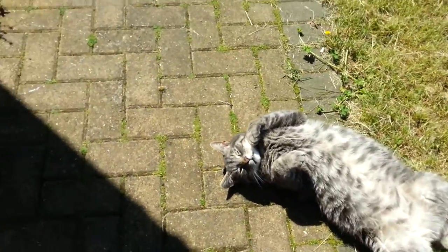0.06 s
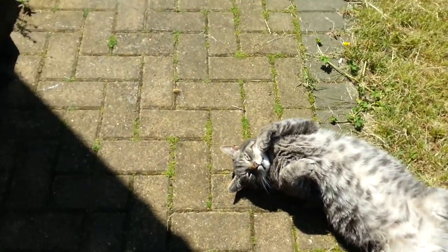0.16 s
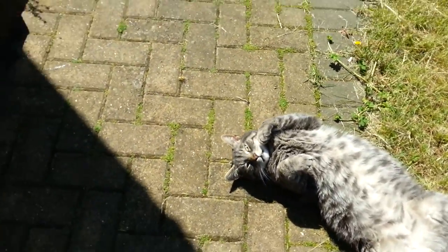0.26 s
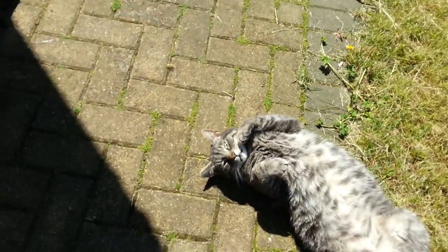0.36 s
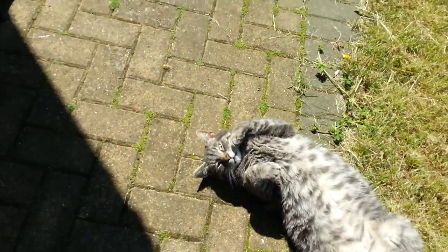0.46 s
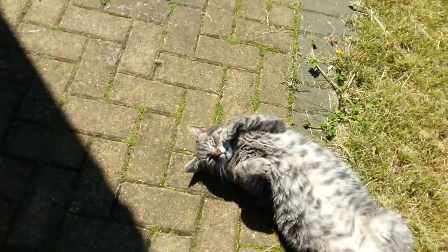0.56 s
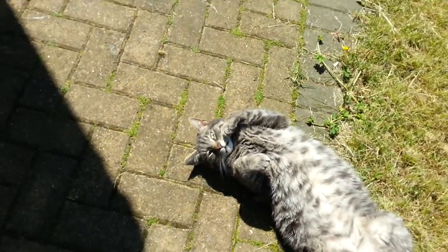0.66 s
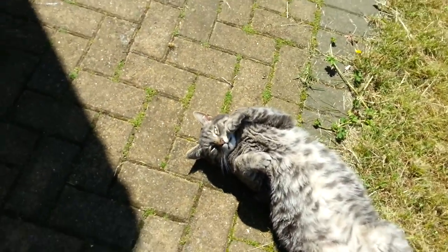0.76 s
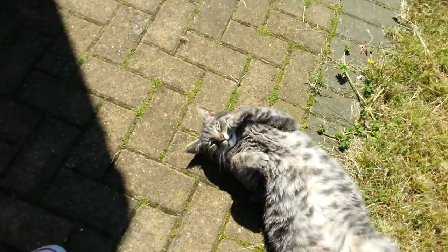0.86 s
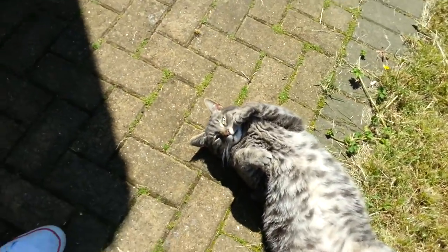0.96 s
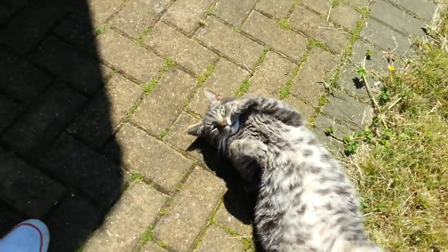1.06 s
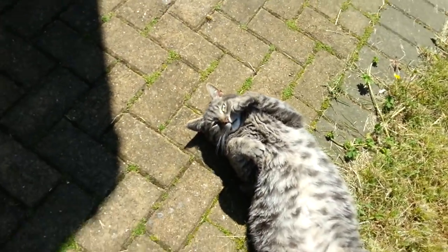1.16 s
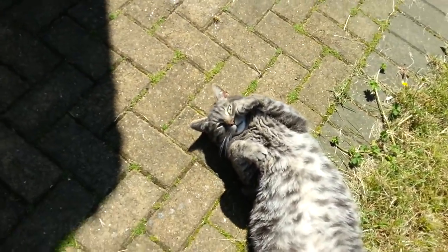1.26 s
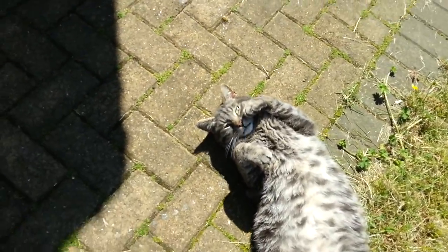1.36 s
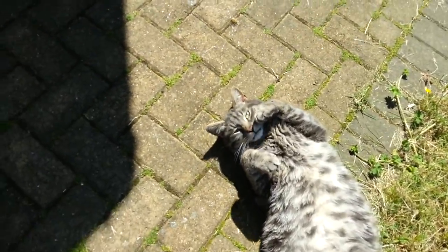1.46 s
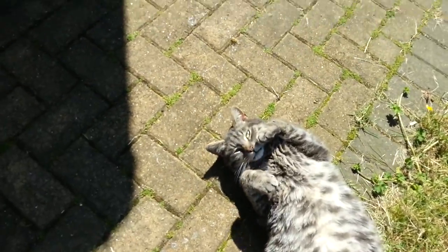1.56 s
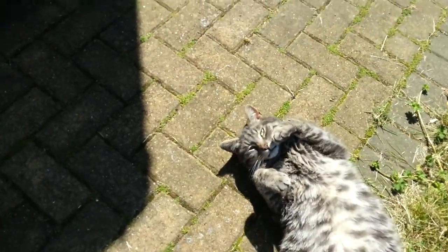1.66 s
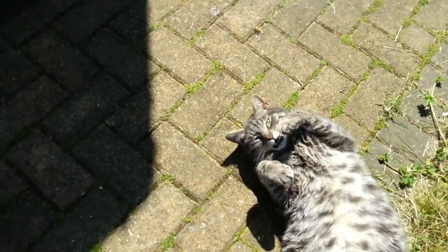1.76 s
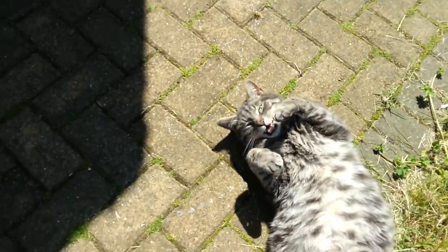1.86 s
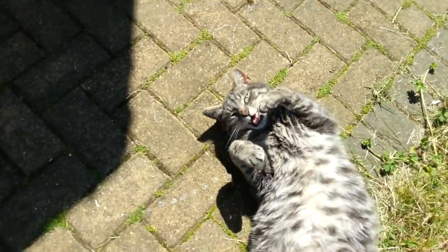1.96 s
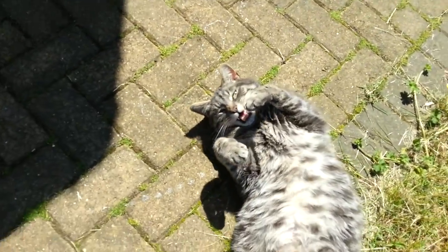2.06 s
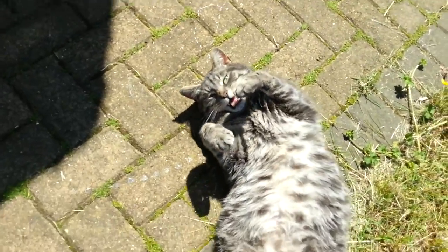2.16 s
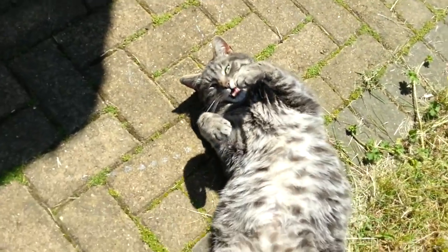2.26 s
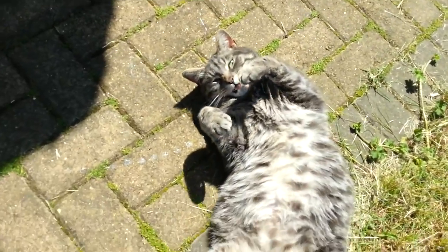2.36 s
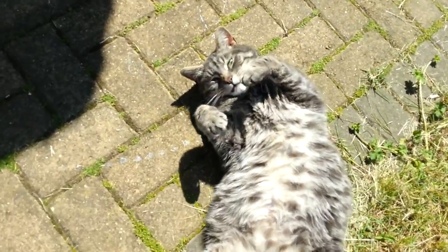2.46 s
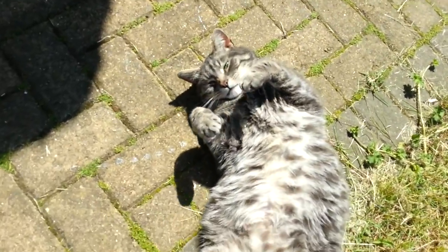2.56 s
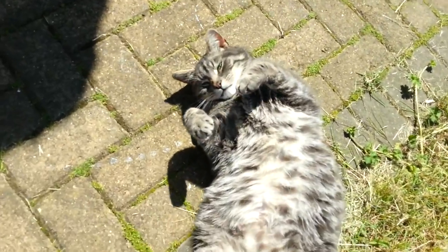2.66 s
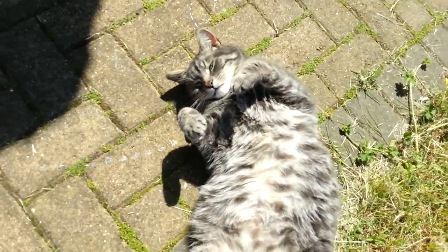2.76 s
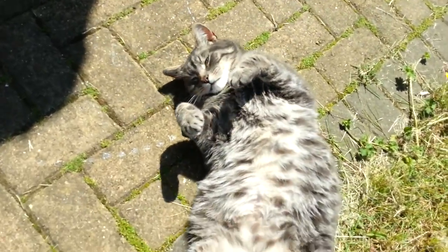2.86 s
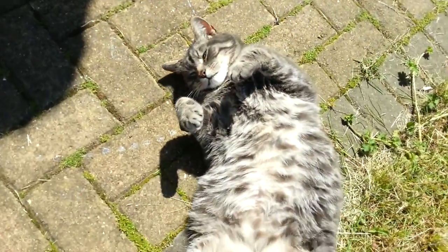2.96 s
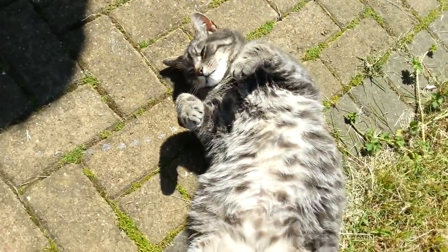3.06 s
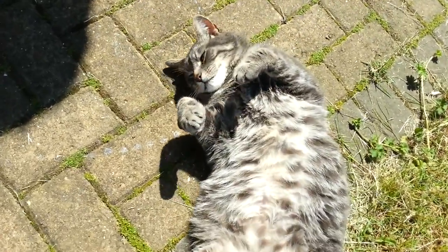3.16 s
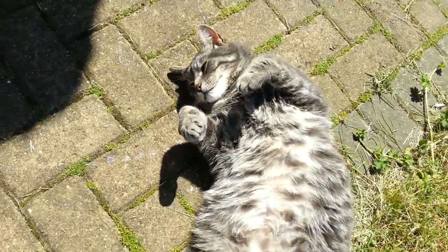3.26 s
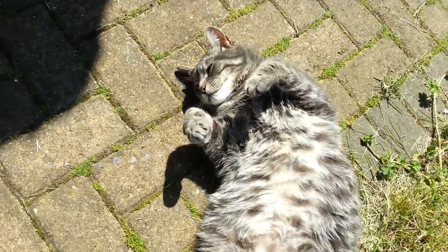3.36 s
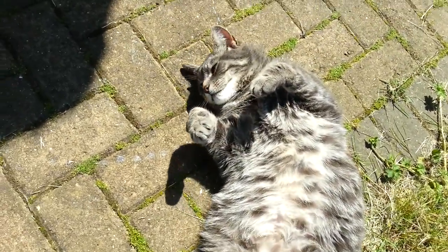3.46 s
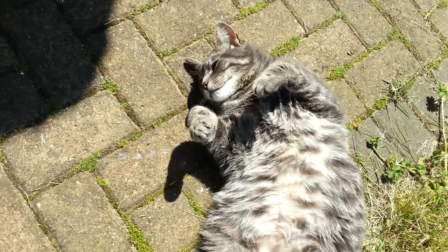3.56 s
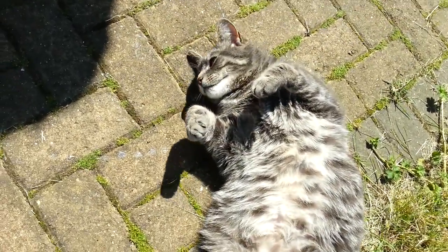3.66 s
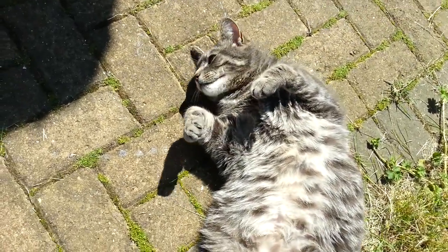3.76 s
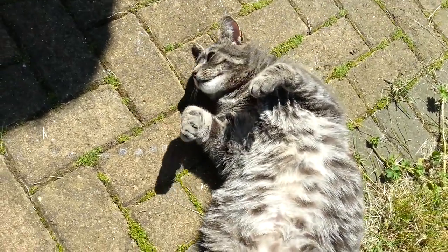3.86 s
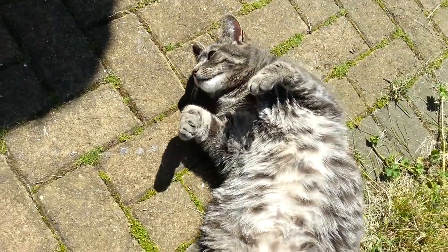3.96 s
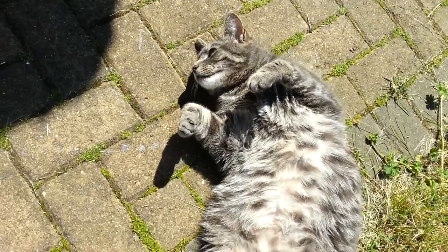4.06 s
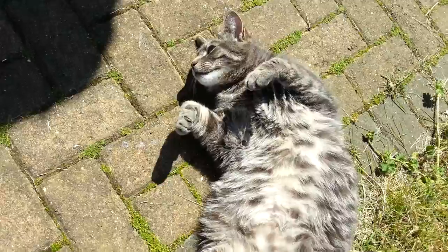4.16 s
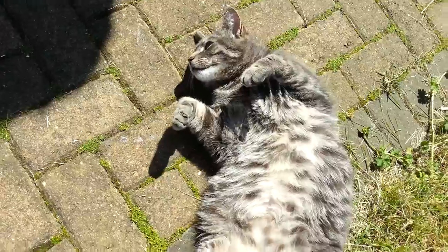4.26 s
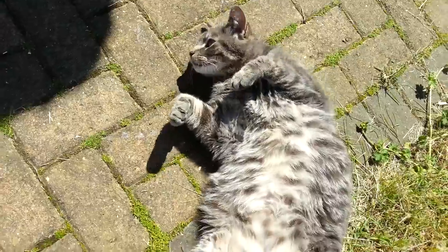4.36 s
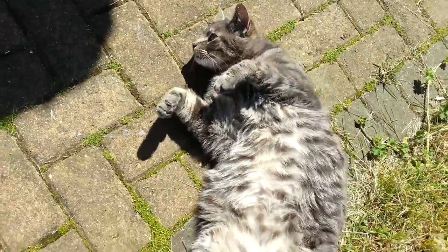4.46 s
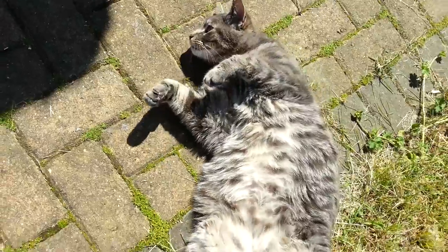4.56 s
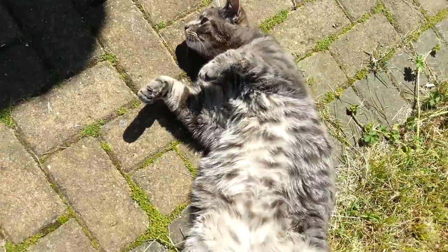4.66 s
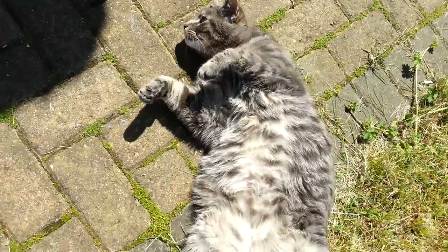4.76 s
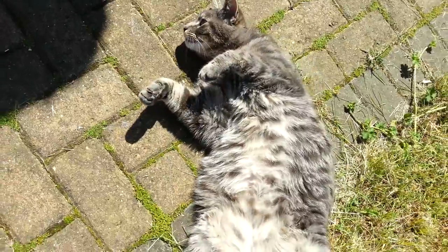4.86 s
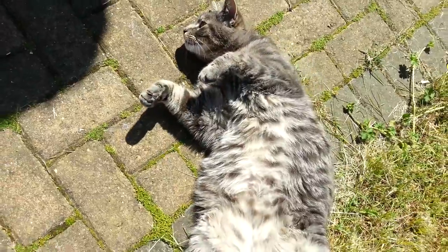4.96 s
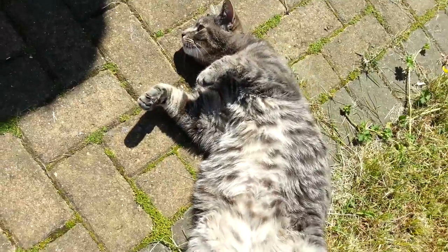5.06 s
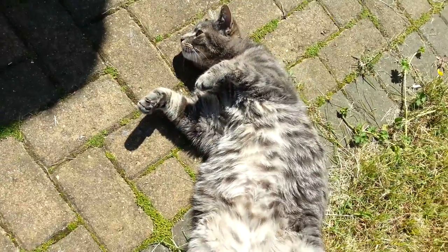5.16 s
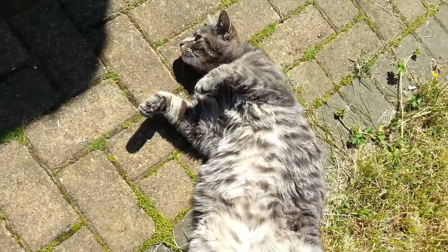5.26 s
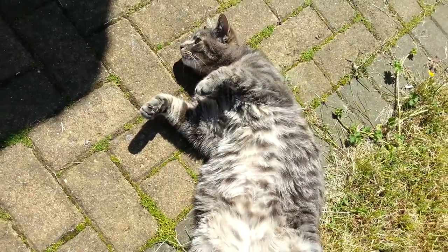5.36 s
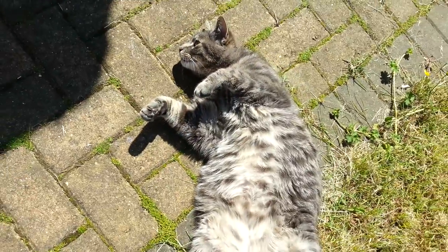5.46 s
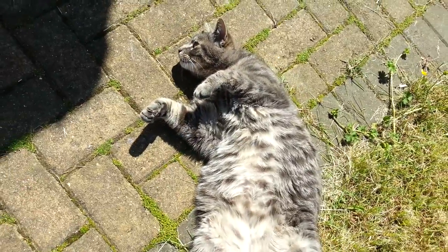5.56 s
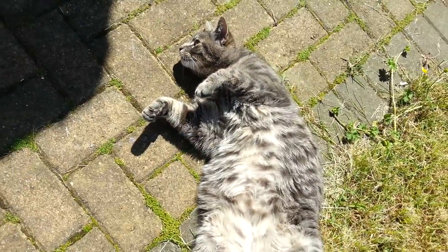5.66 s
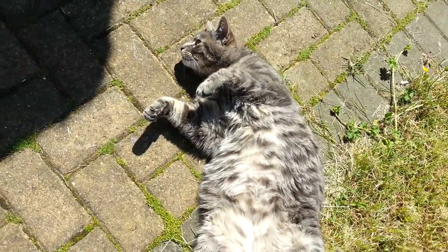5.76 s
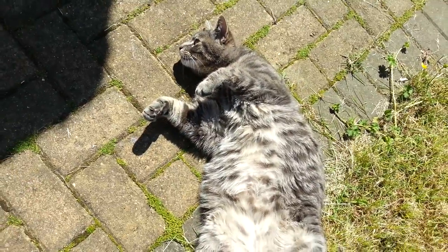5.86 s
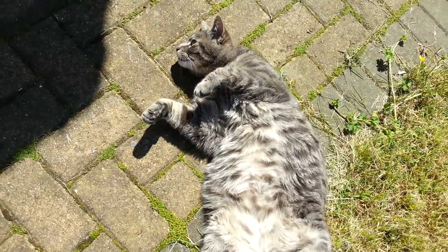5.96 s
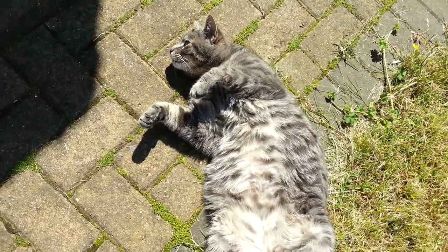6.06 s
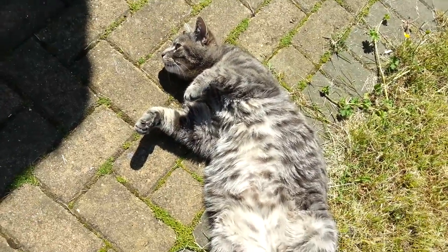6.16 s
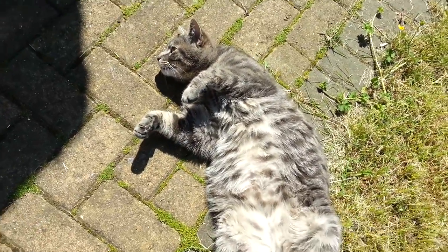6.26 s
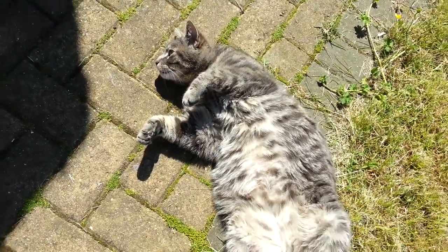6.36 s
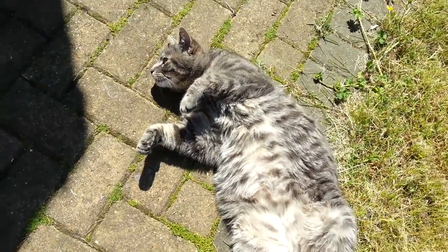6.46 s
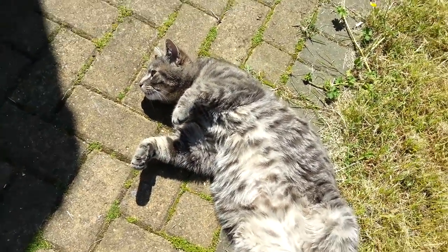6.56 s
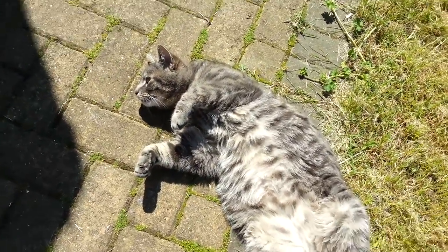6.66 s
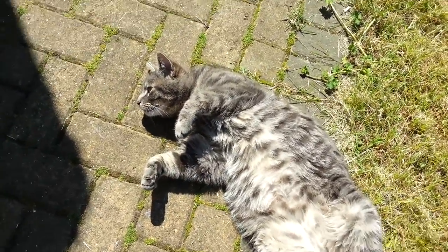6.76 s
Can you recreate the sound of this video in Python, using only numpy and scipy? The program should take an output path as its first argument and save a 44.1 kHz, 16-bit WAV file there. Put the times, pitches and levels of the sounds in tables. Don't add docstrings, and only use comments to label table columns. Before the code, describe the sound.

Steady airy hiss and uneven low rumble lie under everything, picked up by a handheld stereo microphone. From 0 to 0.9 seconds a strap creaks, cloth slides and fingers tick and bump the case. A far engine swells around 1.6 while shoes scuff brick at 1.1 and 1.4 to 1.6. At 1.8 a cat close by starts a thin high squeak, drops into a brief creak near 2.0, then a mid-pitched rippling warble until 2.47, trailing into a fluttering breath by 2.65. Soft thuds come near 3.2. At 4.2 to 4.3 a door slams in a rapid cluster of blows, very loud and clipped, ringing between walls for under a second. The engine returns faintly. Palm rustle and clicks crowd the left at 5.0 to 5.4, a sharp snap cracks right of centre at 5.96, then soft trembling bumps on the right and small creaks until nearly 6.8.

```python
import sys
import numpy as np
from scipy import signal
from scipy.fft import rfft, irfft
from scipy.io import wavfile
from scipy.ndimage import uniform_filter1d

SR = 44100
rng = np.random.default_rng(int(sys.argv[2]) if len(sys.argv) > 2 else 0)


def persist_wave(psi):
    counts = np.round(np.clip(psi, -1, 1) * 32767).astype(np.int16)
    wavfile.write(sys.argv[1], SR, np.atleast_2d(counts).T)


def volts(x):
    e = np.asarray(x, float) / 20
    return 10 ** e


N = 300762

# (start [s], effort [dB], pitch [Hz], final effort [dB], final pitch [Hz])
WARBLE = [(2.062, -34, 595, -32.5, 503), (2.093, -33.5, 500, -33, 540), (2.13, -33, 540, -30, 575),
          (2.177, -35, 512, -35.5, 500), (2.212, -35.5, 500, -34, 524), (2.245, -35, 500, -31, 543),
          (2.282, -30.5, 546, -28.5, 558), (2.312, -30, 535, -28, 529), (2.356, -26, 560, -29, 584),
          (2.378, -30, 582, -32, 574), (2.41, -32, 578, -33, 590), (2.435, -33, 586, -34, 577)]


def evened(x):
    return x / np.sqrt(np.mean(x ** 2) + 1e-20)


def levelled(x):
    return x / np.sqrt(uniform_filter1d(x ** 2, size=700) + 1e-9)


def uneven(count, size):
    return evened(uniform_filter1d(rng.standard_normal(count), size=size))


def read(points, count):
    f_hz, value = np.transpose(points)
    return np.interp(np.log(np.fft.rfftfreq(count, 1 / SR) + 1), np.log(f_hz + 1), value)


def curve(rows):
    s, *columns = np.transpose(rows)
    t = np.arange(s[0], s[-1], 1 / SR)
    return s[0], [np.interp(t, s, c) for c in columns]


def add(mix, s, sound):
    part = mix[..., round(s * SR):][..., :sound.shape[-1]]
    part += sound[..., :part.shape[-1]]


def resonate(x, hz, width_hz):
    turn = np.exp(2j * np.pi * np.cumsum(hz * np.ones(len(x))) / SR)
    r = np.exp(-np.pi * width_hz / SR)
    return 2 * (turn * signal.lfilter([1 - r], [1, -r], x / turn + 1e-18)).real


def steep(x, hz, width_hz):
    return resonate(resonate(resonate(x, hz, width_hz), hz, width_hz), hz, width_hz)


def band(x, lo_hz, hi_hz):
    sos = signal.butter(2, [lo_hz, min(hi_hz, SR / 2.2)], "bandpass", fs=SR, output="sos")
    return evened(signal.sosfilt(sos, x))


def panned(x, lr_db):
    left = 2 / (1 + volts(-np.clip(lr_db, -24, 24)))
    return np.array([left * x, (2 - left) * x])


def field(colour, same, balance, count):
    a, b = rfft(rng.standard_normal((2, count)))
    c = np.clip(read(same, count), -1, 1)
    half = volts(read(balance, count) / 2)
    z = np.array([a * half, (c * a + np.sqrt(1 - c ** 2) * b) / half]) * volts(read(colour, count))
    z /= np.sqrt(half ** 2 + half ** -2. + 2 * c)
    x = irfft(z, count)
    return x / np.sqrt(np.mean(x.mean(0) ** 2))


def garden():
    # (frequency [Hz], density [dB per Hz])
    air = [(15, -56), (25, -34), (66, -9), (213, -3.5), (415, -11), (450, -14.5), (488, -12.5),
           (621, -12.5), (952, -11), (1120, -13.5), (3010, -19.5), (4040, -16), (5720, -23.5),
           (13800, -23.5), (15000, -26)]
    # (frequency [Hz], port likeness [-1..1])
    air_same = [(60, 0.31), (180, 0.67), (550, 0.27), (1650, -0.12), (4970, 0.047), (15000, -0.1)]
    # (frequency [Hz], L-R [dB])
    air_lr = [(60, 1), (110, 2), (200, 3), (380, -2), (700, -1), (1290, -3.5), (2380, -2.0), (4400, -8),
              (8120, -5.5), (15000, -5.5)]
    # (time [s], level [dB])
    rumble = [
        [(0.0, -51), (3.77, -57.5), (4.2, -56)],
        [(4.7, -63), (5.15, -50), (6.82, -55.5)],
    ]
    # (time [s], level [dB])
    drone = [
        [(0.9, -71.5), (1.65, -60), (2.0, -73)],
        [(4.55, -62.5), (5.404, -62), (5.85, -64)],
    ]

    out = volts(-53.5) * field(air, air_same, air_lr, N)
    s, (db,) = curve(sum(rumble, []))
    gusts = rng.standard_normal((3, len(db)))
    lumps = volts(0.41 * uneven(len(db), 900))
    ports = np.array([band(gusts[0] + 1.13 * g, 119, 543) for g in gusts[1:]])
    add(out, s, volts(db - 3.5) * lumps * ports)
    for rows in drone:
        s, (db,) = curve(rows)
        engine_hz = 134 + 1.64 * uneven(len(db), 4000)
        add(out, s, volts(db + 6.0) * np.sin(2 * np.pi * np.cumsum(engine_hz) / SR))
    return out


def scuffs():
    # (peak [s], rise [s], fall [s], level [dB], L-R [dB])
    shoes = [(0.004, 0.0033, 0.033, -49, 8), (1.068, 0.1, 0.038, -42.5, 7), (1.39, 0.021, 0.028, -32.5, 9),
             (1.455, 0.047, 0.11, -47.5, 5), (1.594, 0.05, 0.081, -41.5, 10),
             (3.073, 0.0049, 0.011, -44, 20)]
    # (peak [s], rise [s], fall [s], level [dB], L-R [dB])
    slides = [(0.407, 0.073, 0.046, -36.5, -13), (.45, 0.034, 0.1, -39.5, -0.5),
              (0.698, 0.048, 0.25, -50, -10), (5.16, 0.17, 0.31, -51.5, 7),
              (5.372, 0.024, 0.076, -46.5, -11), (6.345, 0.022, 0.027, -47.5, -27)]
    # (peak [s], rise [s], fall [s], level [dB], L-R [dB])
    rubs = [(.13, 0.11, 0.16, -67, 11), (.31, 0.17, 0.074, -52, -2), (.635, 0.03, 0.041, -43, -9),
            (5.335, 0.064, 0.016, -41, 45), (6.7, 0.019, 0.084, -52.5, -23)]
    # (low part [dB], top part [dB], top edge [Hz], roundness of the swell [power])
    strokes = [
        (0, -17, 10800, 1.2),
        (0, -9, 9900, 1.68),
        (7, -8, 9100, 2.4),
    ]
    edge_db = -13.5

    out = np.zeros((2, N))
    for rows, (low_db, top_db, top_hz, roundness) in zip((shoes, slides, rubs), strokes):
        for peak_s, rise_s, fall_s, peak_db, lr_db in rows:
            s, (away,) = curve([(max(peak_s - rise_s, 0), 1), (peak_s, 0), (peak_s + fall_s, 1)])
            count = len(away)
            grit = rng.standard_normal((3, SR // 2))[:, :count]
            grit = grit * volts(3.3 * np.minimum(rng.exponential(1, SR // 2), 5))[:count]
            grit = grit * volts(1.6 * uneven(SR // 2, 200))[:count]
            shared, apart = grit[0], 6.5 * grit[1:]
            body = np.array([band(shared + a, 1280, 4660) + volts(top_db) * band(a, 4100, top_hz)
                             for a in apart])
            sole = volts(low_db) * band(shared + 0.24 * apart, 395, 1780)
            swell = volts(peak_db + edge_db * away ** roundness) * signal.windows.tukey(count, .1)
            body = panned(0.85, lr_db)[:, None] * body
            sole = panned(0.72, .5 * lr_db)[:, None] * sole
            add(out, s, swell * (body + sole))
    return out


def strap():
    # (start [s], end [s], peak level [dB])
    creaks = [(0.08, 0.226, -36.5), (0.667, 0.797, -41), (6.492, 6.58, -45), (6.694, 6.758, -54)]
    slips_per_s, ring_hz, t60_s = 100, 1550, 0.011

    out, t = np.zeros((2, N)), np.arange(800) / SR
    for start_s, end_s, db in creaks:
        chance = rng.random((40, 3))
        times = start_s + np.cumsum(.5 + chance[:, 0]) / slips_per_s
        for s, (_, size, tune) in zip(times[times < end_s], chance):
            ring = volts(-60 * t / t60_s) * np.sin(2 * np.pi * ring_hz * (0.617 + 0.64 * tune) * t)
            slip_db = db - 6.6 * size - 5 * (end_s - s) / (end_s - start_s)
            add(out, s, panned(volts(slip_db) * ring, 1.8))
    return out


def handling():
    # (time [s], peak [dB], ring [Hz], low bump relative [dB])
    left_ticks = [(0.4146, -8.5, 880, 2), (0.43, -23, 1610, -1), (0.4392, -28, 775, 3),
                  (0.9287, -30.5, 930, 4), (1.3832, -29, 2480, -28), (1.424, -35, 1959, 2),
                  (1.438, -33.5, 710, 1), (1.447, -33, 1141, 4), (1.459, -28.5, 1820, -3),
                  (1.61, -31, 980, 0), (2.0828, -24, 1680, -22), (2.049, -26, 1800, -22),
                  (2.164, -30, 2500, -20), (2.279, -31, 1800, -20), (1.566, -32, 3030, -20),
                  (1.586, -34, 2500, -20), (4.265, -1, 940, -8), (4.264, -22, 2040, -12),
                  (4.2685, -3, 1950, -21), (4.2688, -2, 940, -12), (4.281, -18, 1510, -9)]
    # (time [s], peak [dB], ring [Hz], low
    # bump relative [dB])
    middle_ticks = [(0.3054, -24.5, 745, -12), (0.5959, -23.5, 750, -1), (0.613, -26, 890, 5),
                    (0.6565, -36.5, 1260, 4), (0.8347, -29, 710, -14), (1.395, -29, 1950, -31),
                    (1.5464, -25.5, 800, -3), (3.1886, -21.5, 890, 1), (1.873, -35, 1500, -1),
                    (1.9, -36, 1200, -3), (1.94, -34, 1500, -2), (1.946, -28.5, 2200, -5)]
    # (time [s], peak [dB], ring [Hz], low bump relative [dB])
    right_ticks = [(0.6254, -26, 1770, -15), (5.4185, -35, 710, -19), (6.335, -30.5, 1350, -19)]
    # (time [s], peak [dB], ring [Hz], low bump relative [dB])
    regrip = [(5.0292, -28.5, 880, 7), (5.033, -29, 714, 10), (5.0474, -29.5, 900, -14),
              (5.077, -30.5, 836, 7), (5.095, -39, 1500, -5), (5.1058, -35, 900, 9),
              (5.1336, -30.5, 710, 6.5), (5.151, -39, 1500, -5), (5.166, -39, 1200, -5),
              (5.194, -38, 1500, -5), (5.209, -34, 695, 9), (5.218, -38, 1500, -5),
              (5.2287, -25.5, 1690, 5), (5.238, -23.5, 1340, 0), (5.25, -38, 1500, -5),
              (5.284, -39, 900, 13), (5.2922, -32, 1500, 4), (5.2964, -28, 1400, -4), (5.301, -34, 900, 7),
              (5.308, -36, 700, 12), (5.3122, -24, 2000, 6), (5.314, -24.5, 1500, 7),
              (5.321, -20, 900, 5.5), (5.3234, -30, 1600, -2), (5.329, -34, 1800, -4),
              (5.3318, -25, 3180, 2), (5.3384, -15, 1550, 0), (5.3412, -40, 2600, -4),
              (5.383, -39, 2400, -5), (5.407, -50, 2400, -5), (5.439, -38, 900, 0), (5.458, -40, 2400, -10)]
    # (L-R [dB], t60 [s], low bump [Hz])
    spots = [
        (21.5, 0.0064, 480),
        (-5.5, 0.009, 537),
        (-17.5, 0.0077, 890),
        (23, 0.0063, 340),
    ]
    # (time [s], peak [dB], pitch [Hz],
    # L-R [dB])
    bumps = [(0.201, -47, 342, 10), (0.219, -33.5, 474, 14), (0.478, -24.5, 292, -7), (0.832, -29, 300, -3),
             (1.843, -62, 333.8, -6), (1.939, -32.5, 330, 23), (2.026, -28.5, 374, 28),
             (3.191, -24, 153, -24), (3.24, -32.5, 176, -21), (3.266, -34.5, 210, -19),
             (4.222, -32, 480, -5), (4.225, -22, 427, -2.0), (4.243, -18, 328, -1), (4.25, -14, 187, -1.5),
             (5.3421, -11.5, 234, 26.0), (5.773, -40, 248, -3), (5.797, -39, 232, -3),
             (5.901, -37, 197, -2), (6.265, -38, 132, -6), (6.503, -37, 148, -8)]
    # (time [s], peak [dB])
    tremor = [(6.067, -33), (6.342, -38), (6.375, -36.5), (6.421, -33), (6.442, -29.5), (6.464, -35),
              (6.531, -33.5), (6.556, -31.5), (6.58, -37), (6.602, -34.5), (6.628, -40), (6.722, -32)]

    out, t = np.zeros((2, N)), np.arange(1600) / SR
    for rows, (lr_db, t60_s, low_hz) in zip((left_ticks, middle_ticks, right_ticks, regrip), spots):
        for s, db, hz, low_db in rows:
            top_hz = 0.35 * hz + 170 * abs(lr_db)
            sweep_hz = 0.8 * hz + top_hz * np.exp(-t / 0.00025)
            ring = -volts(-60 * t / t60_s) * (1 - np.exp(-t * top_hz * 4))
            ring = ring * np.sin(2 * np.pi * np.cumsum(sweep_hz) / SR)
            low = -volts(low_db - 60 * t / (1.27 * t60_s)) * (1 - np.exp(-t / 0.0008))
            low = low * np.sin(2 * np.pi * low_hz * t)
            add(out, s, panned(volts(db - 0.5) * ring, lr_db) + panned(volts(db) * low, 1.7 * lr_db))
    swell = (t / 0.0018) * np.exp(1 - t / 0.0012)
    for s, db, hz, lr_db in bumps + [(s, db, 210, -38) for s, db in tremor]:
        add(out, s, panned(volts(db) * swell * np.sin(2 * np.pi * hz * t), lr_db))
    return signal.sosfilt(signal.butter(2, [130, 5200], "bandpass", fs=SR, output="sos"), out)


def hollows():
    # (start [s], end [s], resonance [Hz], level [dB], L-R [dB])
    strokes = [(0.353, .42, 3900, -51, -4), (0.357, 0.43, 1500, -47, 0), (0.453, .515, 1650, -48.5, -5),
               (0.458, 0.517, 4600, -52, 16), (0.475, 0.536, 323, -43.5, -3), (.61, 0.663, 1440, -47, -8),
               (1.374, 1.41, 8600, -56, 10), (1.375, 1.402, 1790, -43, -3), (1.541, 1.608, 850, -49, -3),
               (1.566, 1.629, 4670, -49.5, 23), (5.3328, 5.337, 1150, -27.5, 19),
               (5.346, 5.353, 2380, -40, 11), (5.364, 5.369, 1810, -41.5, 11), (5.772, 5.836, 230, -46, -3),
               (6.498, 6.594, 1510, -60.5, -14), (6.683, 6.753, 1650, -56.5, -23)]

    out = np.zeros((2, N))
    for start_s, end_s, hz, db, lr_db in strokes:
        noise, clumps = rng.standard_normal((2, SR // 5))[:, :round((end_s - start_s) * SR)]
        width_hz = hz / 2.8 + 140
        grit = noise * volts(3 * evened(uniform_filter1d(clumps, size=150)))
        sung = evened(resonate(resonate(grit, hz, width_hz), hz, width_hz))
        add(out, start_s, panned(volts(db) * signal.windows.tukey(len(grit), .25) * sung, lr_db))
    return out


def glides():
    slip_s, last_s, release_s = .005, 2.456, .016
    ends_s = [row[0] - slip_s for row in WARBLE[1:]] + [last_s]
    rows = []
    for (s, db, hz, last_db, last_hz), end_s in zip(WARBLE, ends_s):
        rows += [(s, db, hz), (end_s, last_db, last_hz)]
    return rows + [(last_s + release_s, -56, 600)]


def mew():
    # (time [s], effort [dB], pitch [Hz])
    squeak = [(1.822, -55, 1345), (1.832, -39.5, 1343), (1.851, -50, 1296), (1.872, -40, 1348),
              (1.895, -45, 1305), (1.905, -40, 1253), (1.93, -37, 1146), (1.956, -39, 1077),
              (1.96, -34, 986.5), (1.972, -36.5, 894)]
    # (time [s], effort [dB], pitch [Hz])
    creak = [(1.976, -38, 259.3), (1.99, -38, 180.7), (2.008, -36.5, 188.2), (2.015, -36.5, 240.6),
             (2.035, -34.5, 235.4), (2.056, -38, 206.4)]
    # (time [s], roughness [0..1])
    roughness = [(1.82, .01), (1.95, .025), (1.99, .36), (2.054, .38), (2.066, .12), (2.1, .04),
                 (2.19, .05), (2.25, .04), (2.29, .028), (2.36, .015), (2.41, .024), (2.47, .015)]
    # (time [s], mouth resonance [Hz], brightness [dB])
    jaw = [(1.885, 1290, -35), (1.905, 1220, -15), (1.956, 1120, -5), (1.961, 1880, -9), (2.03, 1900, -7),
           (2.051, 1520, -4.5), (2.07, 1875, -7.5), (2.25, 1783, -6), (2.309, 1728, -13.5),
           (2.361, 1640, -18.5), (2.409, 1489, -16), (2.472, 1100, -22.5)]
    # (time [s], second resonance [Hz])
    tongue = [(1.9, 3700), (1.955, 3160), (1.97, 3460), (2.249, 3510), (2.3, 3300), (2.36, 3300),
              (2.399, 3226), (2.45, 2970)]
    # (resonance [Hz], width [Hz], level [dB], shift as the jaw closes [Hz])
    throat = [
        (1244, 614, -3.5, 24),
        (5360, 620, 0, 380),
    ]

    s, (effort_db, hz) = curve(squeak + creak + glides())
    count = len(hz)
    t = s + np.arange(count) / SR
    at_s, mouth_hz, bright_db = np.transpose(jaw)
    mouth_hz = uniform_filter1d(np.interp(t, at_s, mouth_hz), size=900)
    second_db = np.interp(t, at_s, bright_db)
    closing = np.linspace(-.25, 1, count)

    rough = np.interp(t, *np.transpose(roughness))
    for row in WARBLE[3:7]:
        rough += .04 * np.exp(-((t - row[0]) / .005) ** 2)
    wobble, shimmer = uneven(count, 150), uneven(count, 150)
    turns = np.cumsum(hz * np.clip(1 + .42 * rough * wobble, .3, 2)) / SR

    even = volts(-26 * np.clip((hz - 1040) / 90, 0, 1))
    folds = np.zeros(count)
    for k in range(1, 45):
        folds += np.cos(2 * np.pi * k * turns) * (k * hz < 9000) * (1 if k in (1, 3) else even)
    folds *= np.sqrt(hz / 500) * volts(1.3 * rough * shimmer)
    puff = .3 + rough + np.exp(-(turns % 1) / .4)
    folds += 5.5 * rough ** .75 * puff * rng.standard_normal(count)
    hazy = folds + (hz < 900) * rng.standard_normal(count)

    low, third = (volts(db) * steep(hazy if f_hz > 2000 else folds, f_hz + shift_hz * closing, width_hz)
                  for f_hz, width_hz, db, shift_hz in throat)
    second = steep(hazy, np.interp(t, *np.transpose(tongue)), 1080)
    fry = rough * resonate(folds, 810, 400)
    voice = levelled(steep(folds, mouth_hz, 610) - low + fry)
    voice = voice + volts(second_db) * levelled(second)
    third_db = second_db - 5.5 + 8 * closing
    voice -= np.clip((closing + 0.09) / 0.065, 0, 1) * volts(third_db) * levelled(third)
    voice -= 0.35 * resonate(voice, 2920, 350)
    teeth = band(rng.standard_normal(count), 830, 4600)
    voice += volts(-12.5) * teeth * np.clip(1 - closing, 0, 1)

    chest_hz, chest_db = 560, -46.5
    steady = uniform_filter1d(1. * (abs(hz - chest_hz) < 100) * (rough < .3), size=400)
    chest = volts(chest_db) * np.sqrt(2) * steady * np.cos(2 * np.pi * turns)
    return s, (volts(effort_db) * voice + chest) * signal.windows.tukey(count, .02)


def cat():
    # (delay [s], level [dB])
    paving = [(.0011, -46), (.0027, -57), (.0063, -26)]
    # (time [s], level [dB], pitch [Hz])
    pant = [(2.455, -44.5, 446), (2.52, -44.5, 452), (2.626, -48.5, 430), (2.66, -60, 410)]
    # (multiple of the flutter [1], level [dB], width [Hz])
    nose = [(1, -6.5, 33), (2, 7, 170), (3, -12, 136)]
    # (frequency [Hz], L-R [dB])
    cat_lr = [(60, 6), (110, 0.5), (200, -2), (380, -6), (700, 0.5), (1290, -4.5), (2380, 2.0), (4400, 46),
              (8120, 7), (15000, -34)]
    # (frequency [Hz], L-R phase [rad])
    cat_phase = [(100, -1), (1380, 1), (1980, 2), (3530, 3), (5680, 5)]

    x = np.zeros(N)
    add(x, *mew())
    start_s, end_s = 2.375, 2.5
    count = round((end_s - start_s) * SR)
    hoarse = evened(steep(rng.standard_normal(count), 1392, 260))
    add(x, start_s, volts(-42.5) * np.hanning(count) * hoarse)
    direct = x.copy()
    for delay_s, db in paving:
        add(x, delay_s, volts(db) * direct)

    s, (db, hz) = curve(pant)
    air = rng.standard_normal(len(db))
    flutter = sum(volts(d) * evened(resonate(air, k * hz, width_hz)) for k, d, width_hz in nose)
    haze = volts(4) * evened(steep(air, 1120, 750))
    add(x, s, volts(db) * evened(flutter + haze))

    ratio = volts(read(cat_lr, N)) * np.exp(1j * read(cat_phase, N))
    right = 2 * rfft(x) / (1 + ratio)
    return irfft(np.array([ratio * right, right]), N)


def door():
    # (time [s], bang [dB], panel kick [dB])
    blows = [(4.2187, -35.5, -26), (4.241, -38, -15), (4.256, -18.5, -36), (4.264, -13, -30),
             (4.28, -21, -7), (4.31, -19, -17)]
    # (frequency [Hz], density [dB per Hz])
    bang_colour = [(24, -41), (60, -10), (102, -14), (174, -8), (308, -7), (420, -4), (560, -10), (884, -6),
                   (1040, -6), (1140, -6.5), (3420, -15.5), (6650, -28), (9600, -39.5), (12500, -76),
                   (21100, -120)]
    # (frequency [Hz], port likeness [-1..1])
    door_same = [(60, 0.95), (180, 0.94), (550, 0.97), (1650, 0.65), (4970, -0.66), (15000, 0.38)]
    # (frequency [Hz], L-R [dB])
    door_lr = [(60, -2), (110, -7), (200, 0), (380, -1.5), (700, -1), (1290, 2), (2380, 15.5), (4400, 21),
               (8120, 40), (15000, -26)]
    # (frequency [Hz], level [dB])
    panel = [(131.4, -17), (182, -8), (247.6, -15), (306, -12), (365, -10), (477, -21), (517, -20),
             (723, -21), (834.4, -14), (899, -20), (1021, -13), (1248, -30), (1767, -23), (2273, -15)]
    # (frequency [Hz], width [Hz], level [dB], t60 [s])
    alley = [(1350, 160, -36, 1.7), (527, 26, -40, 1.23), (250, 40, -26, 0.85)]
    walls_t60_s, panel_t60_s, panel_db = 0.54, 0.6, -25

    count, first_s = SR, blows[0][0]
    t, power, kicks = np.arange(count) / SR, np.zeros(count), np.zeros(count)
    for s, bang_db, kick_db in blows:
        since_s = np.maximum(t - s + first_s, 0)
        power += (volts(bang_db - 60 * since_s / walls_t60_s) * (1 - np.exp(-since_s / 0.00036))) ** 2
        add(kicks, s - first_s, volts(kick_db) * rng.standard_normal(300) * np.hanning(300))
    rattle = volts(uneven(count, 120))
    bang = field(bang_colour, door_same, door_lr, count) * np.sqrt(power) * rattle

    whistle = evened(resonate(rng.standard_normal(round(.085 * SR)), 7880, 220))
    whistle = whistle * signal.windows.tukey(len(whistle), .4)
    add(bang, 0, panned(volts(-38.5 - 2 * np.linspace(0, 1, len(whistle))) * whistle, 26))
    for hz, width_hz, db, t60_s in alley:
        linger = evened(resonate(rng.standard_normal(count), hz, width_hz))
        add(bang, .045, panned(volts(db - 60 * t / t60_s) * linger, 0))

    ring = sum(volts(db - 60 * t / panel_t60_s) * np.sin(2 * np.pi * hz * t) for hz, db in panel)
    ring = signal.fftconvolve(kicks, ring)[:count]
    bang += panned(volts(panel_db) * ring / np.sqrt(np.mean(ring[:9000] ** 2)), -3.3)
    return first_s, signal.sosfilt(signal.butter(6, 56, "highpass", fs=SR, output="sos"), bang)


def snap():
    # (time [s], level [dB], treble [dB per octave], L-R [dB])
    snaps = [
        (5.95604, -14.5, 0, -14.5),
        (6.6802, -35, -23, -15),
    ]
    # (mode [Hz], level [dB], t60 [s])
    catch = [(544, 0.5, 0.011), (1164, -4, 0.015), (1684, 3.5, 0.0064), (3200, 2, 0.0037), (3790, 5, 0.003),
             (5400, -18, 0.002), (7700, -9, 0.0009)]

    out, t = np.zeros((2, N)), np.arange(1200) / SR
    for s, level_db, tilt_db, lr_db in snaps:
        for k, (hz, db, t60_s) in enumerate(catch):
            since_s = np.maximum(t - 0.00103 * (500 / hz) ** .745, 0)
            sign = (-1) ** k if hz < 2300 else -1
            mode_db = level_db + db + tilt_db * max(np.log2(hz / 1700), 0)
            ring = sign * volts(mode_db - 60 * since_s / t60_s) * np.sin(2 * np.pi * hz * since_s)
            add(out, s, panned(ring, lr_db))
    return signal.sosfilt(signal.butter(2, 150, "highpass", fs=SR, output="sos"), out)


def scene():
    mix = garden() + scuffs() + strap() + handling() + hollows() + cat() + snap()
    add(mix, *door())
    return mix


def top_cut(x):
    return signal.sosfilt(signal.butter(12, 17000, fs=SR, output="sos"), x)


def record(dry):
    lowpass = signal.firwin(401, 14650, window=("kaiser", 8), fs=SR)
    x = signal.oaconvolve(np.clip(dry, -1, 1), lowpass[None], "same")
    top = signal.sosfiltfilt(signal.butter(8, 10300, "highpass", fs=SR, output="sos"), x)
    loud_db = 10 * np.log10(abs(uniform_filter1d((x ** 2).mean(0), size=2048)) + 1e-12)
    mix = x - top * np.clip((loud_db + 28) / 10, 0, .8)
    return top_cut(mix)


dry = scene()
out = record(dry)
persist_wave(out)
```